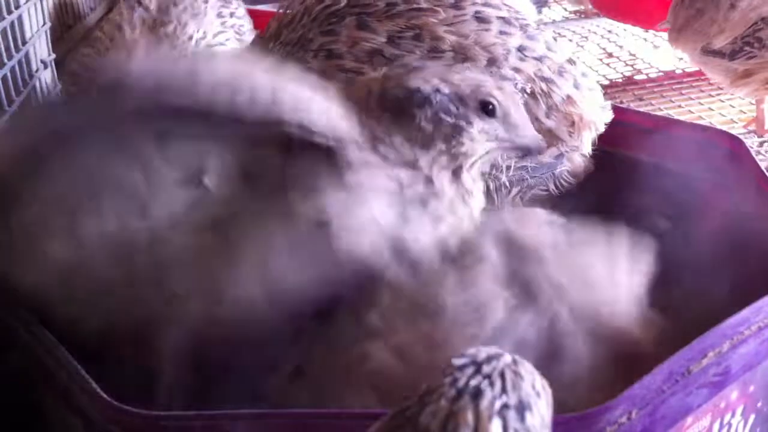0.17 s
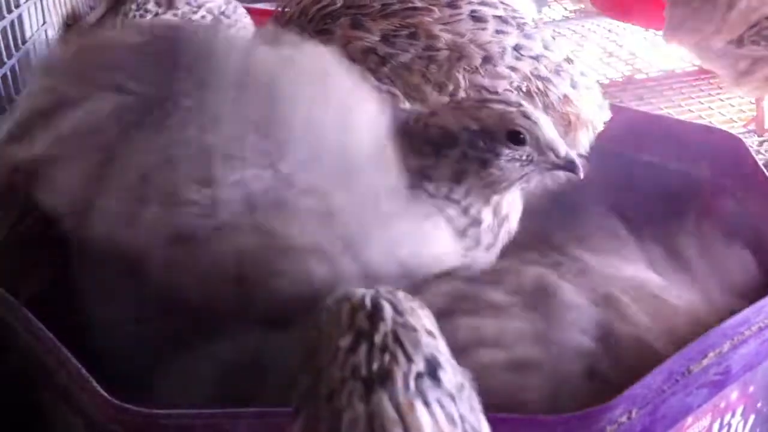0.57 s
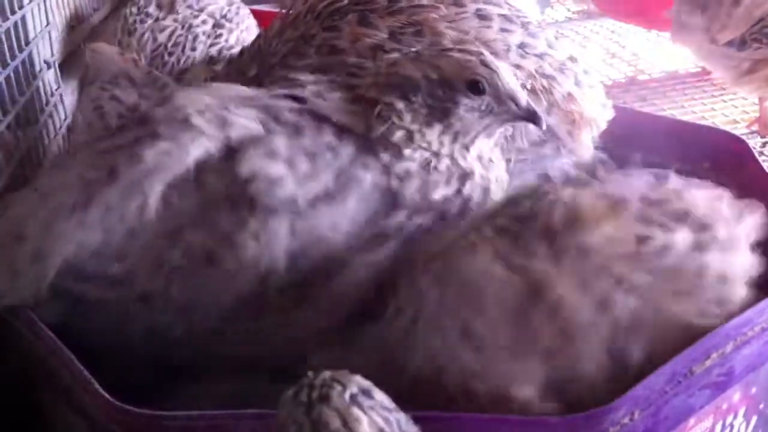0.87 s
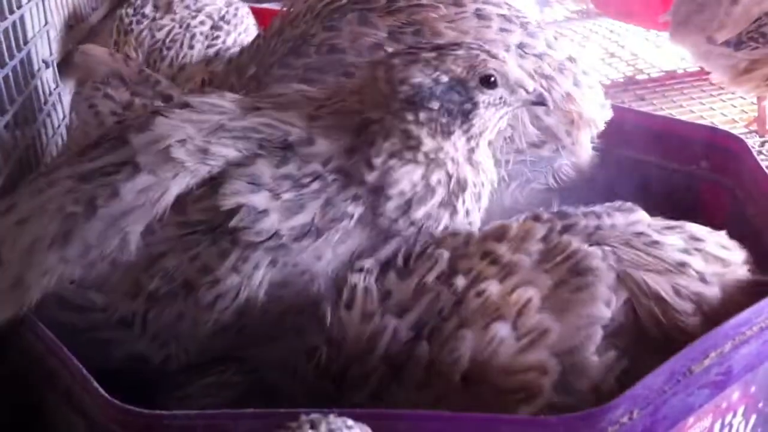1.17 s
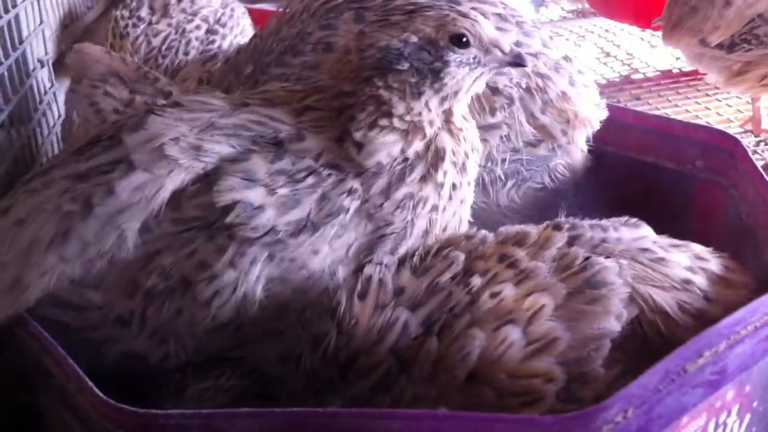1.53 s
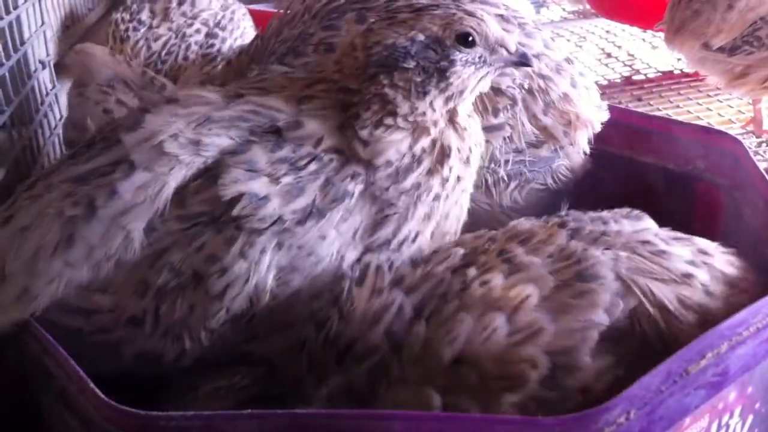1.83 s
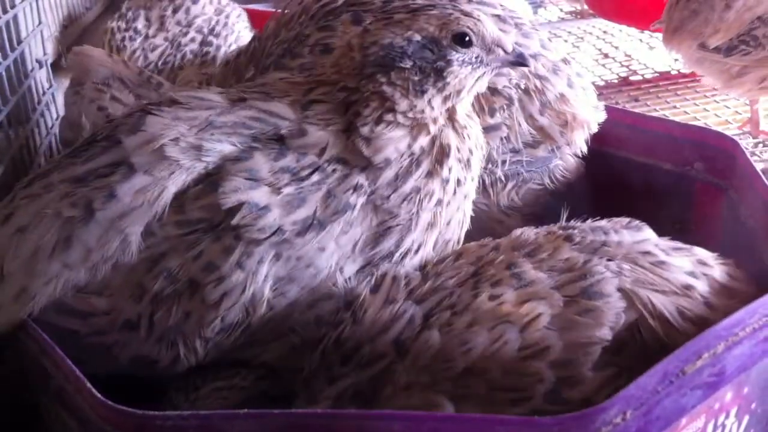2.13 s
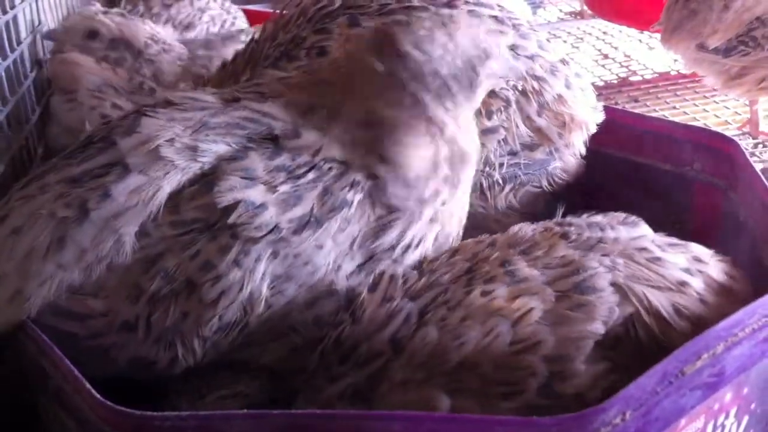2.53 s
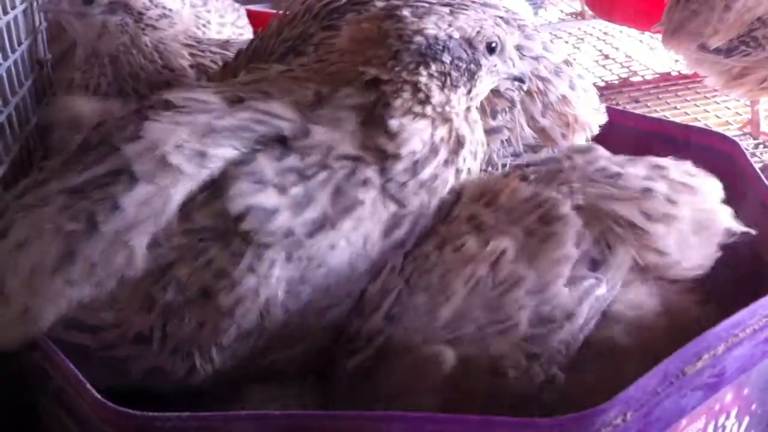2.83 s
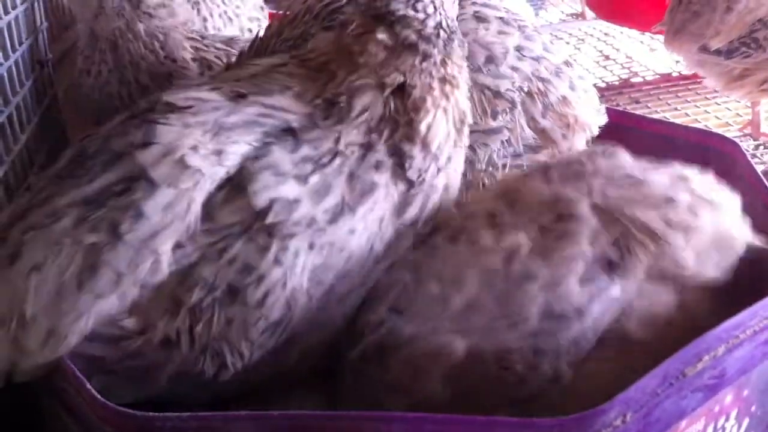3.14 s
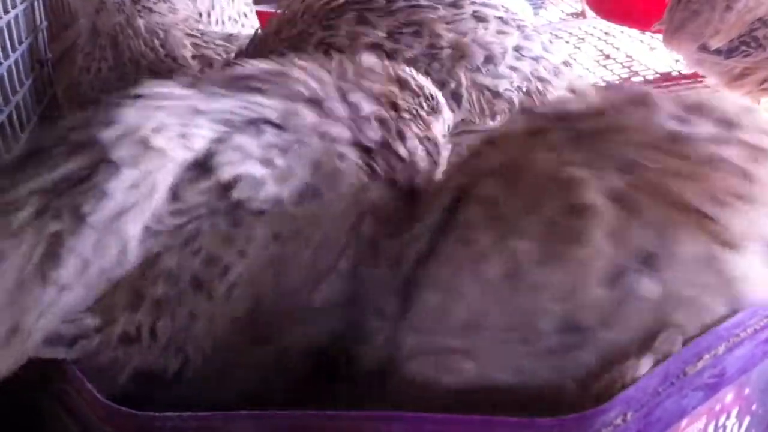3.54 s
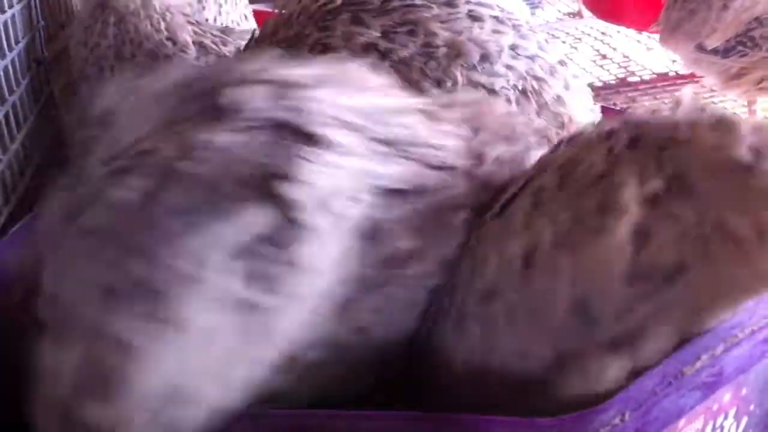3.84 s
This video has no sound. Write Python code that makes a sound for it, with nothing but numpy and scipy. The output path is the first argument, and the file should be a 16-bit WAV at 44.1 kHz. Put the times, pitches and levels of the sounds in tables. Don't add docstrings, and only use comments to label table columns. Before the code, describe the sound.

Small birds knock and scuffle in a gritty plastic tub, close to the microphone: a rapid flurry of hollow taps, sand and feathers, a quiet pause with tiny soft coos, then sparser knocks and scrapes over faint yard hum.

```python
import sys
import numpy as np
from scipy import signal
from scipy.fft import rfft, irfft
from scipy.io import wavfile
from scipy.ndimage import uniform_filter1d

SR = 44100
rng = np.random.default_rng(int(sys.argv[2]) if len(sys.argv) > 2 else 0)


def to_wav(sig):
    pcm = np.clip(np.atleast_2d(sig), -1, 1) * 32767
    pcm = np.round(pcm).astype(np.int16)
    wavfile.write(sys.argv[1], SR, pcm.T)


def volts_from_db(level):
    exponent = np.asarray(level, float) / 20
    return 10 ** exponent


N = 176400

# pitch_hz [Hz], level_db [dB], t60_s [s]
TUB_MODES = [(462, -10.5, 0.18), (625.7, 7, 0.099), (834, 5, 0.065), (1070, 6.5, 0.068), (1219, 8, 0.043),
             (1421, 9.5, 0.046), (1680, -2.5, 0.053), (2425, 5, 0.029), (2950, 4, 0.012), (4285, 4, 0.011),
             (5550, 3, 0.0067)]


def evened(x):
    return x / np.sqrt(np.mean(x ** 2) + 1e-20)


def colour(x, points):
    hz, db = np.transpose(points)
    bins_hz = np.fft.rfftfreq(len(x), 1 / SR)
    gain_db = np.interp(np.log(bins_hz + 1), np.log(hz), db)
    return irfft(rfft(x) * volts_from_db(gain_db), len(x))


def above(x, hz):
    return signal.sosfilt(signal.butter(3, hz, "high", fs=SR, output="sos"), x)


def add(mix, start_s, sound):
    part = mix[round(start_s * SR):][:len(sound)]
    part += sound[:len(part)]


def patchy(x, depth_db, count, size):
    z = signal.stft(x, SR, nperseg=512, noverlap=384)[2]
    field = uniform_filter1d(rng.standard_normal(z.shape), size=count, axis=0)
    field = uniform_filter1d(field, size=size, axis=1)
    gain = evened(volts_from_db(depth_db * evened(field)))
    return signal.istft(z * gain, SR, nperseg=512, noverlap=384)[1][:len(x)]


def wall(weights_db, detune, damp):
    t = np.arange(5000)[:, None] / SR
    hz, db, t60 = np.transpose(TUB_MODES)
    decay = volts_from_db(db + weights_db - 60 * damp * t / t60)
    return (decay * np.sin(2 * np.pi * hz * detune * t)).sum(axis=1)


def knock(start_s, peak_db, spot_hz, crack_db, dry_db=0):
    t = np.arange(5000) / SR
    noise, rattle_noise = rng.standard_normal((2, len(t)))
    attack = np.minimum(t * spot_hz / 1.5, 1)
    decay = volts_from_db(5.5 - 60 * t * spot_hz / 10)
    blow = attack * decay * np.sin(2 * np.pi * spot_hz * t)

    hz = np.transpose(TUB_MODES)[0]
    reach_oct = 0.71
    weights_db = -6 * (np.log2(hz / spot_hz) / reach_oct) ** 2
    ring = wall(weights_db, rng.uniform(0.935, 1.06, len(hz)), 0.54)
    ring = ring / abs(ring).max()

    rattle_t60_s, crack_t60_s = 0.083, 0.013
    rattle = evened(signal.fftconvolve(rattle_noise, ring[:700], "same"))
    rattle = rattle * volts_from_db(-60 * t / rattle_t60_s) * np.minimum(t / 0.0018, 1)

    click = 9 * (np.arange(len(t)) == 20)
    crack = evened(colour(noise + click, [(1500, 12.5), (3000, 3.5), (6000, 0), (15000, -22.5)]))
    crack = crack * volts_from_db(crack_db + 7.5 - 60 * t / crack_t60_s)

    sound = 1.09 * blow + volts_from_db(-16.5) * ring + volts_from_db(-16 + dry_db) * rattle + crack
    lag_s = 0.001015
    floor_hz = min(0.42 * spot_hz, 450)
    return start_s + lag_s, volts_from_db(peak_db) * above(sound, floor_hz)


def grit(per_s, spread_db):
    size = volts_from_db(spread_db * np.minimum(rng.exponential(1, N), 4)) * rng.standard_normal(N)
    return size * (rng.random(N) < per_s / SR)


def shuffles():
    # start_s [s], length_s
    # [s], drag_db [dB], sand_db [dB], feathers_db [dB]
    strokes = [(0, 0.042, -52, -55.5, -56), (0.081, 0.03, -47, -55.5, -66), (0.108, 0.1, -55.5, -61, -61),
               (0.205, 0.055, -50, -52, -59.5), (0.248, 0.1, -55, -54, -60.5),
               (0.313, 0.058, -44, -45.5, -56.5), (.362, .045, -58, -62, -64),
               (0.396, 0.075, -47.5, -57, -59), (.435, 0.065, -61, -62, -55),
               (0.476, 0.062, -47, -54, -57.5), (0.55, 0.075, -47.5, -53.5, -56.5),
               (0.629, .018, -74, -54.5, -54), (0.652, 0.04, -51.5, -61.5, -66.5),
               (.69, .055, -66, -68, -72), (0.735, 0.094, -52, -59.5, -64.5), (0.781, 0.077, -57, -54, -63),
               (0.855, 0.037, -55, -66, -63), (0.88, 0.1, -59, -63, -70), (0.933, 0.063, -52, -54, -59),
               (1.008, 0.012, -75, -52.5, -66), (1.026, 0.024, -48, -48.5, -60),
               (1.039, .18, -60.5, -59, -66.5), (1.179, 0.041, -56.5, -77, -85),
               (1.217, 0.17, -71.5, -68, -72), (1.354, 0.09, -78, -76, -68),
               (1.68, 0.37, -87, -74.5, -77.5), (2.3, 0.14, -73, -71, -76), (2.477, 0.039, -61, -97, -77),
              (2.545, 0.045, -70, -64, -67), (2.61, 0.09, -62, -59, -78), (2.728, 0.069, -62, -70, -75),
              (2.774, 0.12, -68, -83, -68), (2.929, 0.099, -65, -88, -73), (3.015, 0.12, -61.5, -69, -74),
              (3.098, 0.079, -63, -67.5, -65.5), (3.13, 0.39, -57, -66.5, -70.5), (3.17, .1, -58, -66, -76),
              (3.339, 0.022, -62, -54, -63), (3.422, 0.028, -62, -63, -61), (3.436, .05, -70, -60.5, -72),
              (3.497, 0.015, -59.5, -69, -68), (3.537, .012, -66, -76, -64), (3.53, 0.12, -64, -73, -84),
              (3.675, 0.02, -68, -72, -74), (3.74, 0.05, -68, -70, -67), (3.785, .02, -62, -60, -70),
              (3.798, 0.051, -53.5, -65, -69), (3.873, 0.095, -63, -66, -74),
              (3.963, .06, -60.5, -64.5, -65.5)]
    # pitch_hz [Hz], level_db [dB]
    sand_spectrum = [(800, 5), (1800, 4), (2700, 7), (4200, -3), (6000, -10.5), (7000, -24), (12000, -31)]
    # pitch_hz [Hz], level_db [dB]
    feather_spectrum = [(2000, -14), (5000, -1), (8000, -8.5), (10500, -5), (16000, -12.5)]

    rise, stop, sag_db = 0.17, 0.27, -10.5
    effort = np.zeros((3, N))
    for start_s, length_s, *levels_db in strokes:
        u = np.arange(0, 1, 1 / (1.115 * length_s * SR + 9))
        shape = np.minimum(u / rise, 1) * np.minimum((1 - u) / stop, 1) * volts_from_db(sag_db * u)
        for k in range(3):
            add(effort[k], start_s, 1.347 * volts_from_db(levels_db[k]) * shape)
    keep = np.exp(-1 / (0.045 * SR))
    effort = effort + volts_from_db(-18) * signal.lfilter([1 - keep], [1, -keep], effort)

    tick = wall(1.45 * np.log2(np.transpose(TUB_MODES)[0] / 900), 0.96, 2.1)
    tick = tick / np.linalg.norm(tick)
    drag = signal.oaconvolve(effort[0] * evened(grit(4000, 3.3)), tick)[:N]
    scrape = patchy(above(drag, 340), 2.6, count=4, size=4)

    sand, plume = grit(7000, 2.5), grit(12000, 1.4)
    toss = colour(effort[1] * sand, sand_spectrum) / colour(sand, sand_spectrum).std()
    brush = colour(effort[2] * plume, feather_spectrum) / colour(plume, feather_spectrum).std()
    return scrape + patchy(toss + brush, 3.0, count=24, size=3)


def swish(start_s, length_s, level_db, from_hz, to_hz, width=.42):
    u = np.arange(0, 1, 1 / (length_s * SR))
    r = np.exp(-np.pi * width * min(to_hz, 5000) / SR)
    noise = rng.standard_normal((len(u), 2)) @ [1, 1j]
    band = signal.lfilter([1], [1, -2 * r, r * r], noise)
    glide = np.exp(2j * np.pi * np.cumsum(from_hz + (to_hz - from_hz) * u) / SR)
    swell = np.sin(np.pi * u ** 0.39)
    return start_s, 1.62 * volts_from_db(level_db) * swell * evened((band * glide).real)


def coo(start_s, length_s, level_db, pitch_hz):
    u = np.arange(0, 1, 1 / (length_s * SR))
    phase = 2 * np.pi * np.cumsum(pitch_hz * (1 + 0.1 * (.5 - u))) / SR
    return start_s, volts_from_db(level_db + 0.5) * np.sin(np.pi * u) * np.sin(phase)


def yard():
    # pitch_hz [Hz], level_db [dB per Hz]
    yard_spectrum = [(15, -36), (55, -38), (97, -15.5), (157, -2.5), (317, -14), (344, -14.5), (1070, -21),
                     (1400, -22.5), (16000, -35)]
    air = patchy(rng.standard_normal(N), 0.9, count=8, size=12)
    return volts_from_db(-63) * evened(colour(air, yard_spectrum))


def scene():
    # start_s [s], peak_db [dB], spot_hz [Hz], crack_db [dB against the blow]
    knocks = [(.084, -33, 620, -35), (.093, -37, 520, -35), (.214, -38, 600, -35), (.322, -34, 800, -25),
              (.68, -44, 1050, -30), (.795, -37, 1250, -22), (.809, -40, 1150, -22), (1.173, -43, 380, -35),
              (2.4875, -47, 560, -33), (2.6965, -38, 1150, -32), (2.762, -42, 600, -35),
              (3.017, -39, 480, -40), (3.197, -43, 1000, -22), (3.814, -38, 600, -35),
              (.015, -40, 1100, -28), (.029, -36, 1150, -25), (.101, -38, 800, -25), (.2055, -27, 900, -14),
              (.497, -39, 800, -25), (.666, -44, 450, -30), (.944, -38, 1300, -25), (2.981, -46, 900, -25),
              (3.343, -41, 600, -30), (3.843, -49, 700, -30), (0.081, -20.5, 1026, -16),
              (0.17, -35, 1360, -25), (0.2095, -23, 1070, -24), (0.287, -37, 1330, -19),
              (0.314, -26, 1167, -32), (0.402, -34.5, 745, -29), (0.421, -32.5, 1070, -21),
              (0.5535, -40, 1370, -29), (0.579, -29, 790, -20), (0.791, -40, 424, -23),
              (0.9295, -36, 700, -22), (1.005, -34, 1500, -21), (1.17, -37.5, 710, -33),
              (1.182, -41.5, 714, -29), (2.479, -41.5, 700, -30), (2.687, -34, 1180, -38),
              (2.701, -44, 480, -32), (2.751, -41, 600, -33), (3.014, -24, 1143, -37),
              (3.025, -38, 560, -40), (3.803, -27.5, 640, -32), (3.879, -45, 980, -19)]
    snaps = [(.4765, -35.5, 1350, -8), (.838, -45, 2440, -10), (.6315, -50, 3300, -12),
             (.404, -42, 165, -35), (2.755, -49, 230, -35), (2.49, -51, 230, -35), (3.5045, -50, 2090, -10),
             (3.5375, -52, 2070, -10), (3.6765, -59, 3300, -6), (.318, -39, 240, -30),
             (1.172, -46, 165, -32), (3.802, -41, 294, -13.5), (.857, -40.5, 1200, -10.5),
             (1.027, -32.5, 1260, -14), (3.339, -26.5, 2330, -18), (.317, -36, 2400, -14),
             (.346, -42, 2600, -8), (.448, -44, 2500, -4), (3.025, -46, 1200, -14)]
    # start_s [s], length_s [s], level_db [dB], pitch_hz [Hz]
    coos = [
        (2.235, 0.033, -59, 1115),
        (2.331, 0.022, -57, 1160),
        (1.84, .03, -72, 2000),
        (2.4, .042, -66, 1400),
        (2.105, .035, -78, 5750),
    ]
    # start_s [s], length_s [s], level_db [dB], from_hz [Hz], to_hz [Hz]
    swishes = [
        (3.44, .03, -62, 4200, 3200),
        (2.775, 0.069, -73, 12500, 12700),
        (2.616, 0.03, -64, 1800, 2800),
        (2.3, 0.22, -76, 2200, 2700),
        (.935, 0.034, -61, 2200, 2900),
        (2.548, 0.03, -66, 4000, 3000),
        (3.12, .21, -66, 1500, 1700),
    ]
    squeaks = [
        (3.439, .011, -52, 4250, 4000),
        (3.447, .021, -56, 2800, 2850),
        (1.05, .175, -72, 6150, 6000),
        (2.63, .025, -62, 2700, 2500),
    ]

    birds = shuffles()
    for row in knocks:
        add(birds, *knock(*row))
    for row in snaps:
        add(birds, *knock(*row, dry_db=-12))
    for row in coos:
        add(birds, *coo(*row))
    for row in swishes:
        add(birds, *swish(*row))
    for row in squeaks:
        add(birds, *swish(*row, width=.1))
    return (above(birds, 120) + yard())[None]


def roll_off(x):
    return signal.sosfilt(signal.butter(12, 16530, fs=SR, output="sos"), x)


def record(dry):
    level_db = 10 * np.log10(abs(uniform_filter1d(dry ** 2, size=200)) + 1e-12)
    jump_db = np.maximum(np.roll(level_db, -300, axis=1) - level_db - 12, 0)
    treble = dry - uniform_filter1d(dry, size=9)
    thinned = dry - treble * (1 - volts_from_db(-.7 * uniform_filter1d(jump_db, size=100)))
    edge = signal.firwin(601, 15850, window=("kaiser", 9), fs=SR)
    mix = signal.oaconvolve(thinned, edge[None], "same")
    return roll_off(mix)


dry = scene()
out = record(dry)
to_wav(out)
```